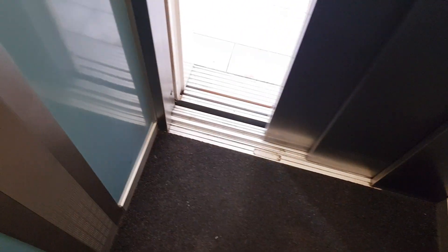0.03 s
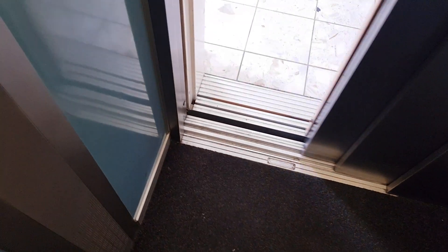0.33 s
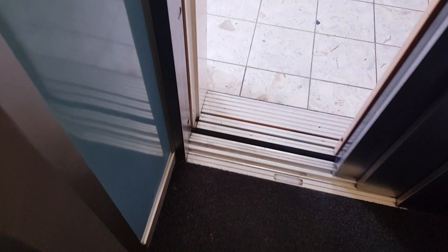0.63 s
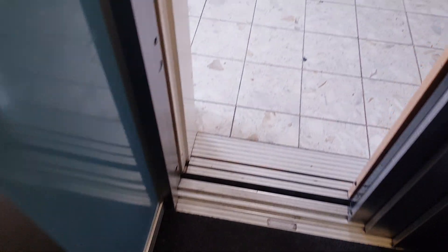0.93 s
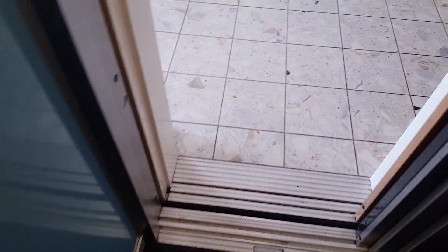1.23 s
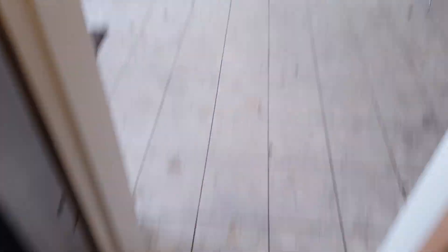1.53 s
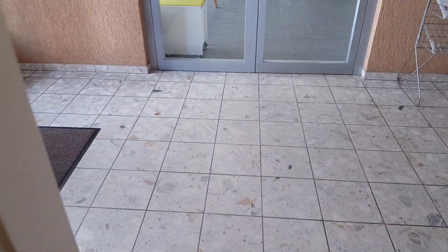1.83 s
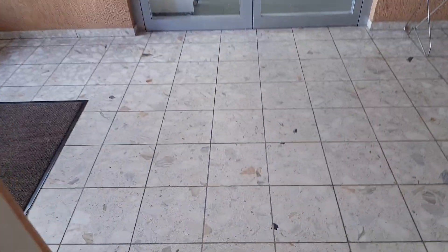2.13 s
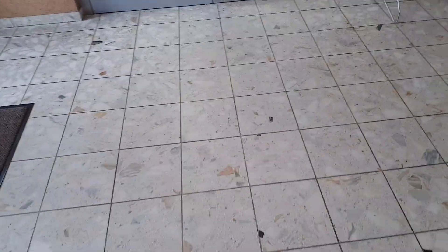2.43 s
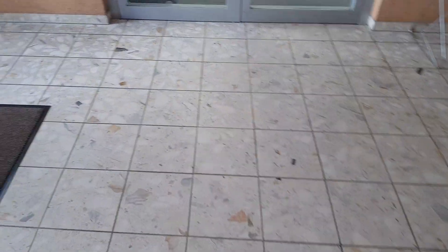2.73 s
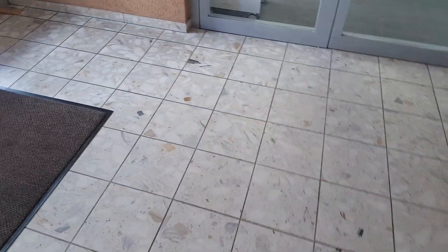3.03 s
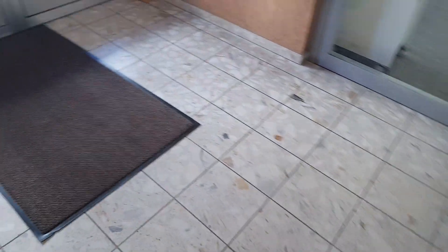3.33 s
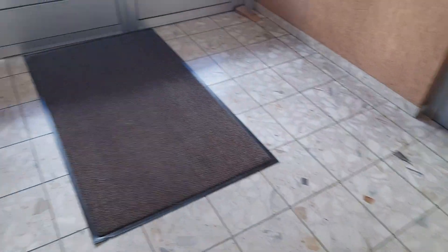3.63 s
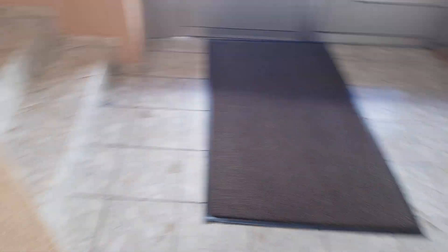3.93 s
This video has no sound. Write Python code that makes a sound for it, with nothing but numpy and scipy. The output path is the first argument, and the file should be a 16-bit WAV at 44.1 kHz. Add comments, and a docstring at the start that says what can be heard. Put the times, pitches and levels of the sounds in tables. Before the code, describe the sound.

Elevator door rumbling open with scrapes and clicks, then soft scuffing steps into a lobby.

```python
"""A lift door slides open: the cabin booms and drones, rollers rumble, sheet-metal panels sing and
guide shoes scrape along the sill, with ticks, knocks, clinks of loose metal and a brief squeak.
The door judders near the end of its travel and the scrape dies away after 2.1 s.
Someone carrying the microphone then steps out into a tiled lobby: clothes rustle, soles squeak and
scuff, and the hall rings."""
import sys
import numpy as np
from scipy import signal
from scipy.fft import rfft, irfft, next_fast_len
from scipy.io import wavfile
from scipy.ndimage import uniform_filter1d

SR = 44100
rng = np.random.default_rng(int(sys.argv[2]) if len(sys.argv) > 2 else 0)


def wav_record(signal):
    """Record a signal, one row per channel, as 16-bit PCM in the file named by sys.argv[1]."""
    frames = np.transpose(np.atleast_2d(signal))
    bounded = np.clip(frames, -1, 1)
    # unit amplitude maps onto the largest positive 16-bit level
    quanta = np.round(bounded * 32767).astype(np.int16)
    wavfile.write(sys.argv[1], SR, quanta)


N = 176400
T = np.arange(N) / SR
FFT_SIZE = next_fast_len(N + SR) // 2 * 2
HZ = np.maximum(np.arange(FFT_SIZE // 2 + 1) * SR / FFT_SIZE, 1)


def from_db(db):
    """Decibels to gain."""
    return 10 ** (np.asarray(db) / 20)


def unit_rms(x):
    """Scale to unit power."""
    return x / np.sqrt(np.mean(np.abs(x) ** 2) + 1e-20)


def pan(left_right_db):
    """Left and right gains."""
    return from_db(np.array([[left_right_db], [-left_right_db]]) / 2)


def at_time(rows):
    """Time table interpolated at every sample."""
    return np.interp(T, *np.transpose(rows))


def at_hz(rows, hz=HZ):
    """Frequency table interpolated on a log axis."""
    row_hz, values = np.transpose(rows)
    return np.interp(np.log(hz), np.log(row_hz), values)


def response(spectrum, tilt_db_per_oct=0):
    """Unit-power response of a spectrum table, falling steeply below its first row."""
    low_cut = np.minimum(HZ / spectrum[0][0], 1) ** 3
    return unit_rms(from_db(at_hz(spectrum) + tilt_db_per_oct * np.log2(HZ)) * low_cut)


def resonance(hz, width_hz):
    """Unit-power response of a steep-sided resonance."""
    detuning = (HZ ** 2 - hz ** 2) / (HZ * width_hz * np.sqrt(2))
    return unit_rms(1 / (1 + detuning ** 2))


def colour(x, gain):
    """Minimum-phase filter with this magnitude response."""
    cepstrum = irfft(np.log(gain + gain.max() * 1e-5))
    cepstrum[1:FFT_SIZE // 2] *= 2
    cepstrum[FFT_SIZE // 2 + 1:] = 0
    return irfft(rfft(x, FFT_SIZE) * np.exp(rfft(cepstrum)))[..., :N]


def drift(knots_per_s):
    """Random wander between unit-variance knots."""
    knots = rng.standard_normal(4000)
    return np.interp(T * knots_per_s, np.arange(len(knots)), knots)


def burst(start_s, decay_s, attack_s):
    """Linear rise, exponential fall."""
    age_s = np.maximum(T - start_s, 0)
    return np.minimum(age_s / attack_s, 1) * np.exp(-np.minimum(age_s / decay_s, 30))


def stroke(start_s, attack_s, hold_s, release_s):
    """Rise, hold, then a fall of 20 dB per release time."""
    fall_db = 20 * np.maximum(T - start_s - attack_s - hold_s, 0) / release_s
    return np.clip((T - start_s) / attack_s, 0, 1) * from_db(-fall_db)


# Sound field at the two microphone ports: (frequency [Hz], left-right correlation [-1..1])
PORT_CORRELATION = [(35, .999), (80, .995), (170, .93), (330, .8), (650, .35), (1300, -.2), (2500, 0),
                    (16000, 0)]


def noise():
    """Stereo white noise, alike at both ports in the bass."""
    correlation = np.clip(at_hz(PORT_CORRELATION), -.999, .9995)
    spectra = rfft(rng.standard_normal((2, N)), FFT_SIZE)
    mid, side = spectra * np.sqrt([(1 + correlation) / 2, (1 - correlation) / 2])
    return irfft([mid + side, mid - side])[:, :N]


def friction(slips_per_s, spread_db, grain_db):
    """Smooth rubbing plus tiny slips of uneven size."""
    slipping = rng.random(N) < slips_per_s / SR
    slips = slipping * from_db(spread_db * np.minimum(rng.exponential(1, N), 4))
    power = signal.lfilter([1], [1, -.96], slips ** 2 + 1e-18)
    return unit_rms(noise() * np.sqrt(1 + from_db(grain_db) ** 2 * power / power.mean()))


def hum(modes, level_db, window_s):
    """Noise-driven resonances, evened out over a window and brought to a level."""
    body = sum(from_db(db) * resonance(hz, width_hz) for hz, width_hz, db in modes)
    ringing = colour(noise(), body)
    power = uniform_filter1d(np.mean(ringing ** 2, axis=0), int(window_s * SR))
    return from_db(level_db) * ringing / np.sqrt(power + 1e-9)


# Boom envelope: (time [s], level [dB])
BOOM_LEVEL = [(0.0, -27), (0.04, -25), (0.26, -30.5), (0.31, -20.5), (0.78, -35), (0.83, -31), (1.31, -41),
              (1.35, -29), (1.45, -40), (1.67, -33), (1.73, -24.5), (1.89, -25), (1.98, -51), (2.05, -23.5),
              (2.08, -31.5), (3.02, -62), (3.16, -49), (4.0, -55)]
# Boom resonances: (frequency [Hz], width [Hz], gain [dB])
BOOM_MODES = [(27.8, 8.5, 0.5), (45.1, 7.75, 7.5)]


def boom(trim_db=-0.5):
    """Deep boom of the shaken cabin, later of the carried microphone."""
    return hum(BOOM_MODES, at_time(BOOM_LEVEL) + trim_db, window_s=0.0417)


# Rumble envelope: (time [s], level [dB])
RUMBLE_LEVEL = [(0.03, -38.5), (0.06, -55), (0.16, -38), (0.24, -47), (0.89, -48), (0.98, -40.5),
                (1.01, -46.5), (1.27, -50), (1.4, -40), (1.43, -43.5), (1.66, -40.5), (2.17, -48.5),
                (2.2, -84), (2.26, -39), (2.78, -62.5), (3.32, -48.5), (3.47, -56.5), (3.53, -48.5),
                (3.59, -62), (3.95, -59.5)]
# Rumble spectrum: (frequency [Hz], gain [dB])
RUMBLE_SPECTRUM = [(100, -16), (130, 5), (160, 3.5), (200, -0.5), (260, -6.5), (320, -13), (420, -18.5),
                   (600, -26.5), (1200, -48.5)]


def rumble(trim_db=-3):
    """Low noise of the door rollers, then of the lobby."""
    return from_db(at_time(RUMBLE_LEVEL) + trim_db) * colour(noise(), response(RUMBLE_SPECTRUM))


# Drone envelope: (time [s], level [dB])
DRONE_LEVEL = [(0.03, -49), (0.79, -45.5), (0.82, -59), (1.18, -40), (1.2, -35), (1.49, -46), (1.66, -33),
               (1.71, -38), (1.75, -22), (1.78, -31), (2.02, -29), (2.05, -36.5), (2.97, -51), (3.11, -47),
               (3.88, -53.5), (3.95, -51.5)]
# Drone resonances: (frequency [Hz], width [Hz], gain [dB])
DRONE_MODES = [(61.4, 15, 0), (95.6, 14.3, 4.5), (107, 32, -10)]


def drone(trim_db=-1.5):
    """Low drone of the lift while the door runs, then faint hum of the carried microphone."""
    return hum(DRONE_MODES, at_time(DRONE_LEVEL) + trim_db, window_s=0.0637)


# Panel envelope: (time [s], level [dB])
PANEL_LEVEL = [(0, -55), (.7, -61), (.85, -50), (1.05, -57), (1.35, -55.5), (1.5, -54), (1.62, -50),
               (1.76, -43), (1.86, -55.5), (1.96, -65), (2.03, -49), (2.15, -66), (2.35, -58), (2.7, -72.5),
               (4, -92)]
# Panel resonances: (frequency [Hz], width [Hz], gain [dB])
PANEL_MODES = [(290.7, 9.2, 2.5), (327, 17, 6), (398.7, 18, -1), (450, 7.3, -3.5), (529, 33, -5)]


def panels():
    """Sheet-metal panels sing as the rollers load them."""
    return hum(PANEL_MODES, at_time(PANEL_LEVEL), window_s=0.095)


# Sill scrape and guide-shoe hiss envelopes: (time [s], level [dB])
SCRAPE_LEVEL = [(0.02, -53.5), (0.15, -56.5), (0.27, -59.5), (0.28, -63), (0.35, -60.5), (0.96, -50),
                (1.0, -55.5), (1.01, -48.5), (1.07, -54.5), (1.11, -49), (1.34, -54.5), (1.35, -55),
                (1.47, -59.5), (1.54, -50.5), (1.57, -52.5), (1.79, -49.5), (1.96, -50), (2.09, -61.5)]
HISS_LEVEL = [(0, -59), (.3, -63.5), (.55, -61.5), (.85, -57), (1.05, -56.5), (1.14, -56), (1.25, -62),
              (1.5, -61.5), (1.6, -54.5), (1.8, -54.5), (1.97, -61.5), (2.04, -72), (2.09, -70)]
# Scrape and hiss spectra: (frequency [Hz], gain [dB])
SCRAPE_SPECTRUM = [(350, 1), (500, -4.5), (700, -2), (950, 0), (1300, -1.5), (1800, -3.5), (2500, -3),
                   (3500, -6), (5000, -6), (6500, -17.5), (9000, -24.5), (12000, -20.5), (15500, -20.5)]
HISS_SPECTRUM = [(6000, -7), (7400, -6.5), (8400, 0.5), (10000, -3), (12000, -2.5), (13500, -17),
                 (16000, -21)]


def door_slide(judder_start_s=1.688, judder_end_s=1.99, judder_hz=25.3, stop_s=2.09, fade_db_per_s=50):
    """Guide shoes scrape and hiss along the sill, juddering near the end of travel."""
    juddering = (T > judder_start_s) * (T < judder_end_s)
    judder_db = 3.8 * np.cos(2 * np.pi * judder_hz * (T - judder_start_s)) * juddering
    flutter_db = drift(61.2)
    pressure_db = judder_db + flutter_db - fade_db_per_s * np.maximum(T - stop_s, 0)
    scrape = friction(slips_per_s=990, spread_db=20, grain_db=-11)
    scrape *= from_db(at_time(SCRAPE_LEVEL) + pressure_db)
    hiss = friction(slips_per_s=350, spread_db=7, grain_db=-8.5)
    hiss *= from_db(at_time(HISS_LEVEL) + pressure_db)
    return colour(scrape, response(SCRAPE_SPECTRUM)) + pan(3.5) * colour(hiss, response(HISS_SPECTRUM))


# Lobby air spectrum: (frequency [Hz], gain [dB])
AIR_SPECTRUM = [(100, -0.5), (300, -22.5), (800, -29.5), (2000, -34), (6000, -52), (10000, -39),
                (16000, -37)]


def lobby_air(level_db=-61):
    """Steady, faint noise of the still lobby."""
    return from_db(level_db) * colour(noise(), response(AIR_SPECTRUM))


# Dry ticks: (time [s], level [dB], treble boost and bass cut [dB], left-right [dB])
TICKS = [(0.105, -45.5, -13, -1), (.47, -53.5, 8, -6), (0.56, -50, 9.5, -7), (0.605, -41, 1, -3),
         (.854, -45, 4.5, -12), (0.95, -43.5, 1, -7), (1.084, -39.5, -3, -1), (1.103, -39.5, -6, -4),
         (1.147, -50.5, -5, 13), (1.281, -39.5, 2, 1), (1.361, -49, 7.5, -7), (1.622, -43, 6, 0),
         (1.689, -47.5, -8, 9), (1.762, -44, 5, 6), (2.1, -51, -5, 12), (2.18, -39, 3.5, -4),
         (2.254, -36.5, 8.5, -6), (2.358, -42.5, 6.5, -11), (2.3753, -31, 1.5, -7.5), (2.397, -32.5, -4, 0),
         (2.403, -42, -3, -3), (2.437, -38.5, 1, -7), (2.455, -34, -1, -3.5), (2.481, -41, 1, -5),
         (2.498, -51, -3, 1), (2.743, -46, -9, 3), (2.8638, -38, 2, -2.5), (2.969, -36, 1.5, -7),
         (3.076, -41, -8, 4), (3.514, -45.5, 3, 5), (3.705, -42.5, -5, -1.5)]
# Tick spectrum: (frequency [Hz], gain [dB])
TICK_SPECTRUM = [(400, -29), (1400, -2.5), (2600, 2.5), (4500, 1), (7000, -6.5), (9000, 1), (12000, -6),
                 (16000, -3.5)]


def ticks(crossover_hz=4800):
    """Door gear and clothing snap, each tick with its own brightness."""
    snap, dull, bright = noise(), 0, 0
    for start_s, db, tilt_db, pan_db in TICKS:
        envelope = burst(start_s, decay_s=0.0019, attack_s=0.00046) * from_db(db) * pan(pan_db)
        dull += envelope * from_db(-tilt_db)
        bright += envelope * from_db(tilt_db)
    lows = signal.lfilter(*signal.butter(2, crossover_hz, fs=SR), snap * dull)
    highs = signal.lfilter(*signal.butter(2, crossover_hz, "high", fs=SR), snap * bright)
    return colour(lows - highs, response(TICK_SPECTRUM))


# Dull knocks: (time [s], level [dB], centre [Hz], decay [s])
KNOCKS = [(0.137, -41.5, 270, 0.028), (0.13, -54, 525, .04), (0.819, -56, 425, 0.057),
          (.28, -51, 910, 0.033), (0.89, -40.5, 204, 0.011), (1.346, -48, 760, 0.048),
          (1.386, -56, 140, 0.018), (1.63, -51, 625, 0.26), (1.68, -33, 106, 0.046),
          (.69, -34.5, 57, 0.073), (.83, -31.5, 59.5, 0.056), (3.25, -50.5, 126, 0.11),
          (2.26, -47.5, 180, 0.065), (2.69, -54, 800, 0.02), (2.996, -46.5, 1100, 0.0078),
          (3.5, -56, 260, 0.056), (3.511, -46, 1500, .012), (3.516, -45, 168, 0.024),
          (3.552, -44.5, 1060, 0.0083)]


def knocks(width_ratio=0.69):
    """Damped blows of door and shoes, each ringing in one broad band."""
    shake, out = noise(), 0
    for start_s, db, hz, decay_s in KNOCKS:
        blow = shake * from_db(db) * burst(start_s, decay_s, attack_s=0.0015)
        out += colour(blow, resonance(hz, hz * width_ratio))
    return out


# Metal clinks: (time [s], level [dB], chatter decay [s], ring gain [dB], focus [Hz])
CLINKS = [(.885, -38.5, 0.0093, -10, 9000), (1.003, -38, .014, 4, 10700), (1.117, -46.5, 0.014, -7, 11500),
          (1.526, -38.5, 0.019, 4.5, 11800), (2.686, -41.5, 0.0039, 5, 10500),
          (3.061, -35, 0.0047, 0.5, 10600)]
# Loose-metal resonances: (frequency [Hz], gain [dB])
METAL_MODES = [(3182, -3.5), (6616, -30), (7181, -2.5), (8150, -7), (8900, -16.5), (9820, -6),
               (10500, -7.5), (10980, -21), (11900, -2), (12570, -14), (13050, -18), (13840, -10),
               (14350, -14), (15100, -11)]
# Contact spectrum: (frequency [Hz], gain [dB])
CONTACT_SPECTRUM = [(400, -33), (1200, -3.5), (3000, 2.5), (5500, 1), (7500, 8), (11500, -3.5),
                    (16000, -2.5)]


def clinks(focus_db_per_oct=11):
    """Loose metal chatters briefly; each contact favours the resonances near its focus."""
    chatter = friction(slips_per_s=3800, spread_db=-1, grain_db=10)
    body = sum(from_db(db) * resonance(hz, width_hz=250) for hz, db in METAL_MODES)
    ringing, contacts = 0, 0
    for start_s, db, decay_s, ring_db, focus_hz in CLINKS:
        hit = chatter * from_db(db) * burst(start_s, decay_s, attack_s=0.0013)
        focus = from_db(-focus_db_per_oct * np.abs(np.log2(HZ / focus_hz)))
        ringing += from_db(ring_db) * colour(hit, unit_rms(body * focus))
        contacts += hit
    return pan(4.5) * ringing + colour(contacts, response(CONTACT_SPECTRUM))


# Rubbing squeaks: (time [s], hold [s], pitch [Hz], level [dB], overtone gain [dB])
SQUEAKS = [(1.157, 0.026, 2440, -50, -30), (1.166, .01, 3700, -55.5, -32),
           (2.464, 0.0075, 2470, -53.5, -28), (2.615, 0.073, 2780, -57, -12),
           (2.688, 0.0058, 2880, -53.5, -13)]
# Squeak resonances: (frequency [x pitch], width [x pitch], gain [dB])
SQUEAK_MODES = [(.62, 0.14, -10.5), (.8, .12, -8), (1, 0.056, -1), (1.3, 0.14, -15)]


def squeaks(overtone_ratio=3.38):
    """Rough stick and slip in a few narrow resonances."""
    rub, out = noise(), 0
    for start_s, hold_s, hz, db, overtone_db in SQUEAKS:
        body = sum(from_db(mode_db) * resonance(hz * ratio, hz * width)
                   for ratio, width, mode_db in SQUEAK_MODES)
        body += from_db(overtone_db) * resonance(hz * overtone_ratio, width_hz=350)
        envelope = from_db(db) * stroke(start_s, attack_s=0.0072, hold_s=hold_s, release_s=0.018)
        out += colour(rub * envelope, body)
    return out


# Fabric strokes: (time [s], attack [s], hold [s], release [s], level [dB])
RUSTLES = [(2.095, 0.014, 0.11, 0.17, -49), (2.214, 0.045, 0.17, 0.079, -48.5),
           (2.451, .004, 0.02, 0.043, -49), (2.51, 0.039, 0.21, 0.36, -63.5),
           (2.875, 0.0059, 0.056, 0.18, -64.5), (2.917, 0.12, 0.042, 0.18, -55)]
# Fabric spectrum: (frequency [Hz], gain [dB])
CLOTH_SPECTRUM = [(300, 3.5), (600, 0), (1200, 1), (2400, 1), (4200, -1), (6500, -6.5), (8500, -4),
                  (11000, -7.5), (14000, -19), (16000, -12.5)]


def clothes(flutter_db=1.1):
    """Fabric rubs in grainy strokes close to the microphone."""
    envelope = sum(from_db(db) * stroke(*timing) for *timing, db in RUSTLES)
    rub = friction(slips_per_s=480, spread_db=0.5, grain_db=-3.5)
    flutter = from_db(flutter_db * drift(70))
    return pan(-0.5) * colour(rub * envelope * flutter, response(CLOTH_SPECTRUM))


# Sole strokes: (time [s], attack [s], hold [s], release [s], level [dB], tilt [dB/octave])
SCUFFS = [(2.729, .004, 0.016, 0.13, -59, 1.5), (3.049, 0.0033, 0.012, 0.46, -55, -0.5),
          (3.421, 0.094, 0.015, 0.066, -56.5, 4), (3.503, .004, 0.02, 0.22, -59.5, 1),
          (3.559, 0.049, 0.15, 0.2, -61, 0.5)]
# Scuff spectrum: (frequency [Hz], gain [dB])
SCUFF_SPECTRUM = [(250, 10), (600, 7.5), (1600, 4), (3000, 1.5), (6500, -9), (10500, -9), (16000, -23)]


def scuffs():
    """Soles brush over gritty tiles."""
    grit = friction(slips_per_s=360, spread_db=15, grain_db=-13)
    return sum(colour(grit * from_db(db) * stroke(*timing), response(SCUFF_SPECTRUM, tilt))
               for *timing, db, tilt in SCUFFS)


def shifting_contacts(rubbing, depth_db=2.2, shifts_per_s=45):
    """Shifting contacts excite each sixth-octave band with a wandering strength of its own."""
    spectrum, out = rfft(rubbing, FFT_SIZE), 0
    band_position = np.clip(6 * np.log2(HZ / 500), 0, 29)
    for index in range(30):
        weight = np.maximum(1 - np.abs(band_position - index), 0)
        band = irfft(spectrum * weight)[:, :N]
        out += band * from_db(depth_db * drift(shifts_per_s * rng.uniform(.7, 1.3)))
    return out


# Lobby reverberation: (frequency [Hz], 60 dB decay time [s])
HALL_T60 = [(250, 0.32), (1000, 0.62), (3000, 0.25), (7000, 0.17), (14000, 0.24)]


def hall(x):
    """Dense reflections from tile and glass; the treble dies first."""
    age_s, tail = T[:SR], 0
    edges_hz = np.geomspace(150, 18000, 8)
    for low_hz, high_hz in zip(edges_hz, edges_hz[1:]):
        bandpass = signal.butter(2, [low_hz, high_hz], "band", fs=SR, output="sos")
        band = signal.sosfilt(bandpass, rng.standard_normal((2, SR)))
        t60_s = at_hz(HALL_T60, np.sqrt(low_hz * high_hz))
        tail += band * from_db(-60 * age_s / t60_s)
    tail *= np.minimum(age_s / 0.0027, 1)
    return signal.fftconvolve(x, tail / np.linalg.norm(tail[0]), axes=1)[:, :N]


def scene():
    """Door, walker and lobby; only impacts and squeaks feed the hall."""
    lows = boom() + rumble() + drone() + panels()
    rubbing = shifting_contacts(door_slide() + clothes() + scuffs())
    snaps, blows, squeals = ticks(), knocks() + clinks(), squeaks()
    reverb = hall(from_db(-10.5) * snaps + from_db(-11) * blows + from_db(-8) * squeals)
    return lows + rubbing + lobby_air() + snaps + blows + squeals + reverb


# Microphone port balance: (frequency [Hz], left-right [dB])
PORT_BALANCE = [(30, 0), (300, 0.5), (1000, 1), (2500, -3.5), (6000, -1), (7000, -8.5), (8200, -21),
                (9500, -13), (11500, -8.5), (14000, -7), (16000, 16)]


def record(dry, hiss_db=-77.5, cutoff_hz=15800):
    """The microphone: left port shaded over most of the treble, self-noise, top cut."""
    left_ratio = from_db(at_hz(PORT_BALANCE))
    right_gain = np.sqrt(2 / (1 + left_ratio ** 2))
    heard = np.array([colour(dry[0], right_gain * left_ratio), colour(dry[1], right_gain)])
    heard += from_db(hiss_db) * rng.standard_normal((2, N))
    lowpass = signal.firwin(401, cutoff_hz, fs=SR, window="blackman")
    return signal.fftconvolve(heard, [lowpass], "same", axes=1)


dry = scene()
out = record(dry)
wav_record(out)
```